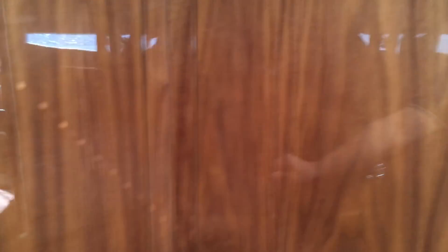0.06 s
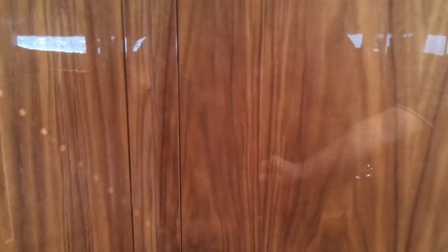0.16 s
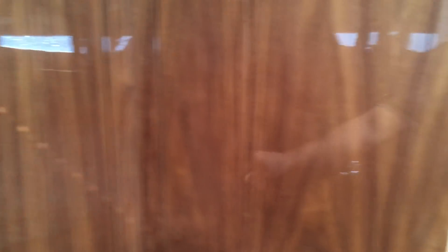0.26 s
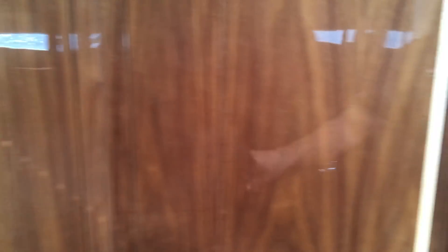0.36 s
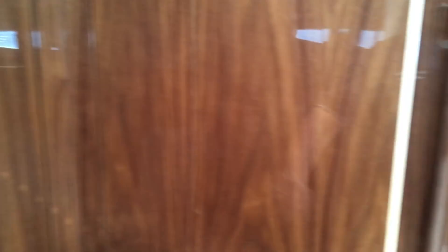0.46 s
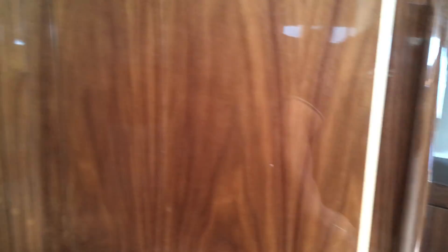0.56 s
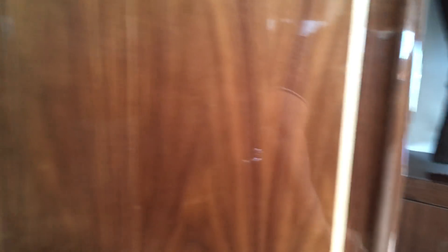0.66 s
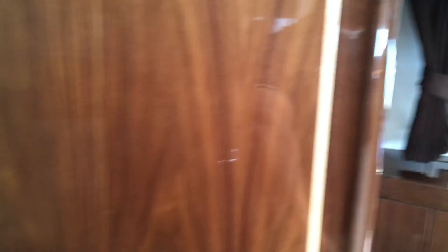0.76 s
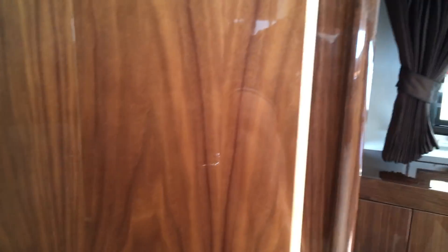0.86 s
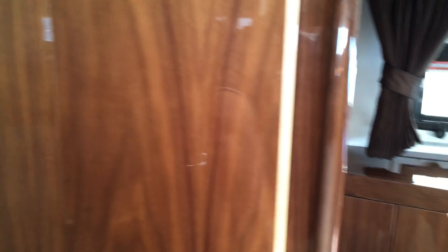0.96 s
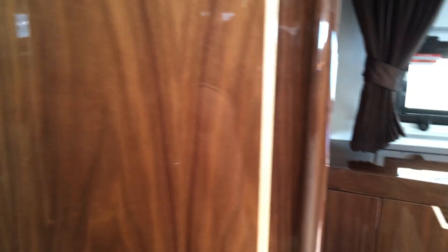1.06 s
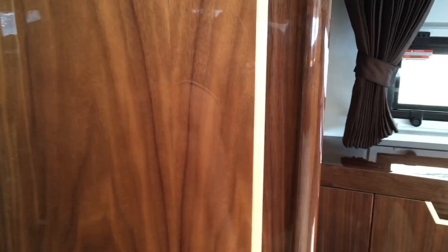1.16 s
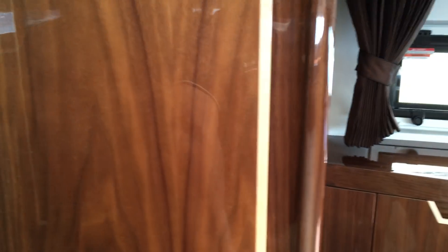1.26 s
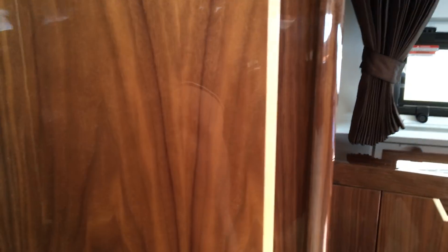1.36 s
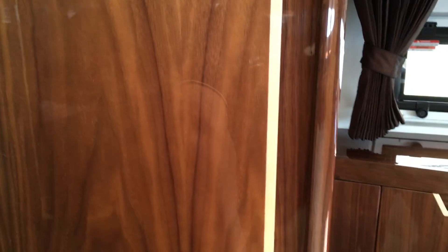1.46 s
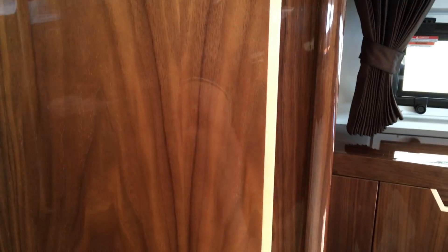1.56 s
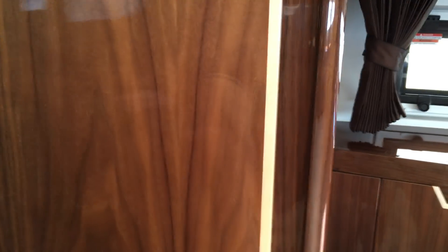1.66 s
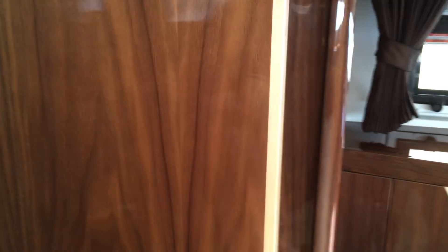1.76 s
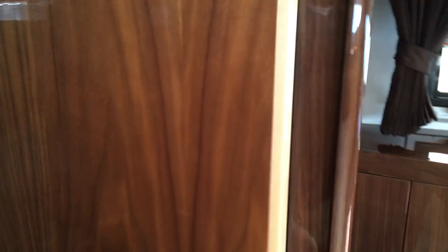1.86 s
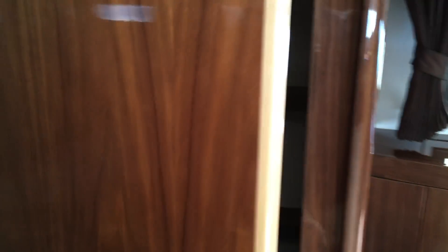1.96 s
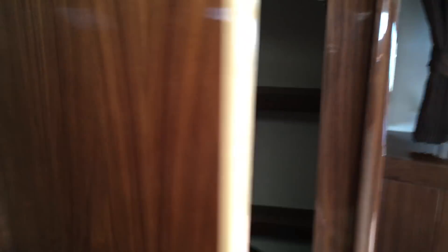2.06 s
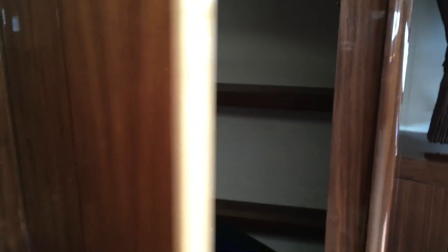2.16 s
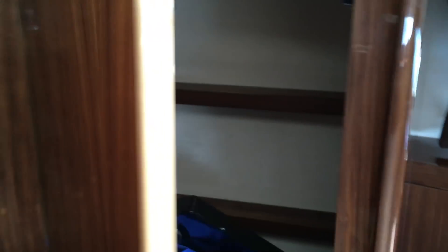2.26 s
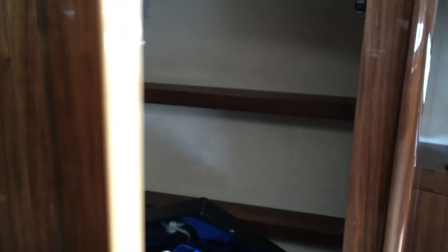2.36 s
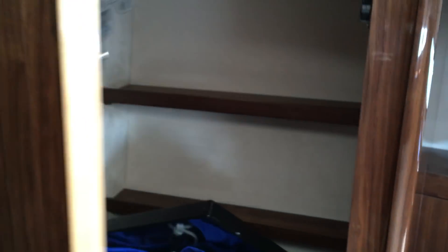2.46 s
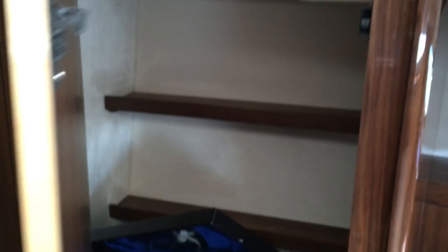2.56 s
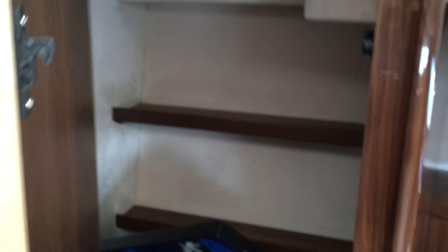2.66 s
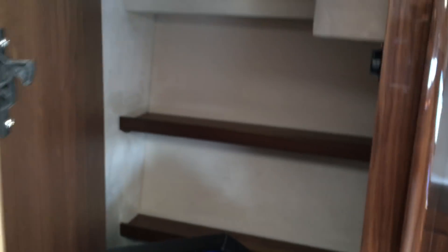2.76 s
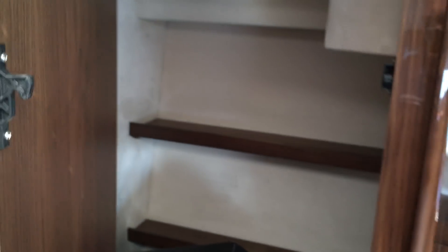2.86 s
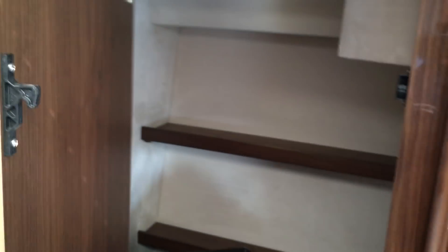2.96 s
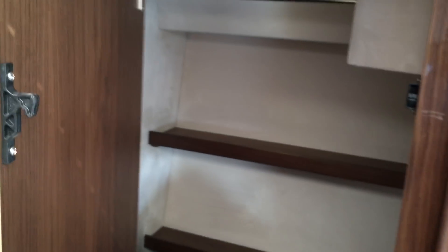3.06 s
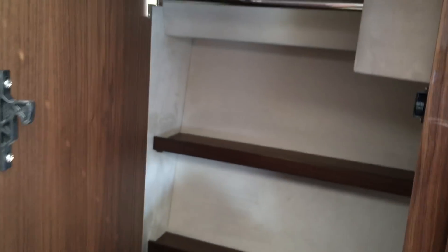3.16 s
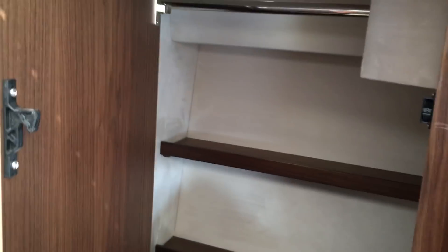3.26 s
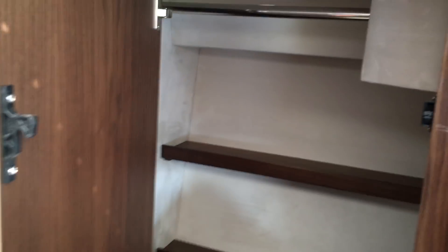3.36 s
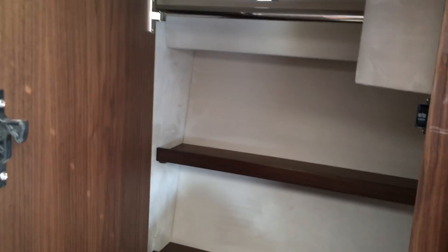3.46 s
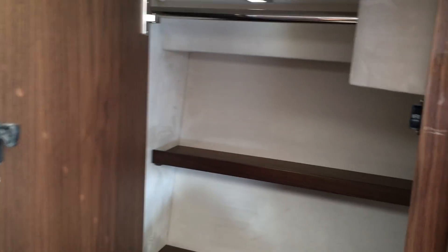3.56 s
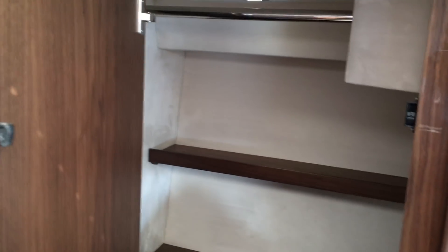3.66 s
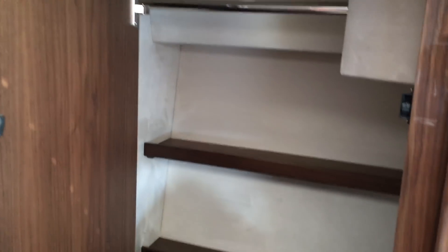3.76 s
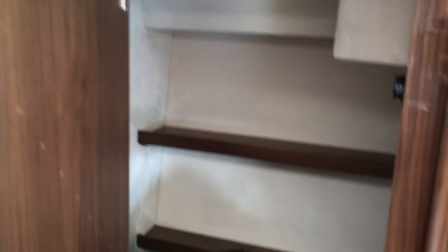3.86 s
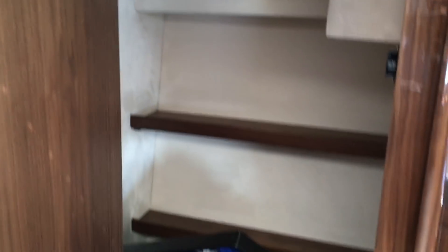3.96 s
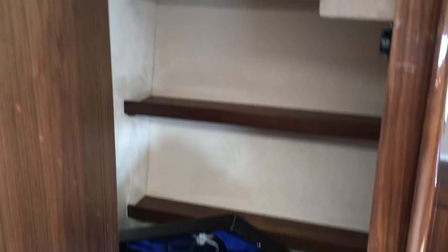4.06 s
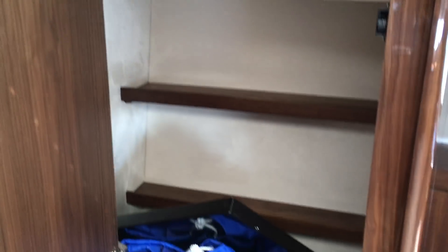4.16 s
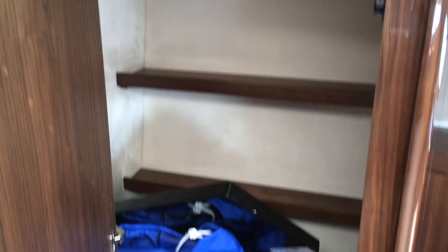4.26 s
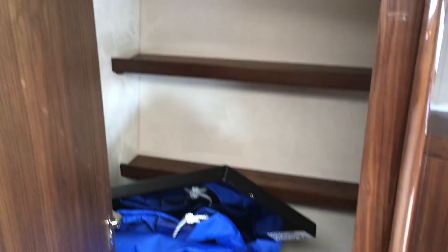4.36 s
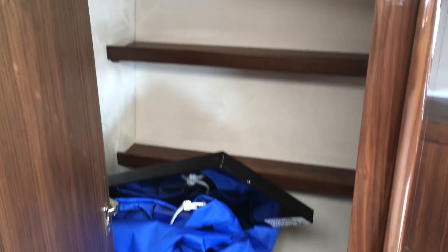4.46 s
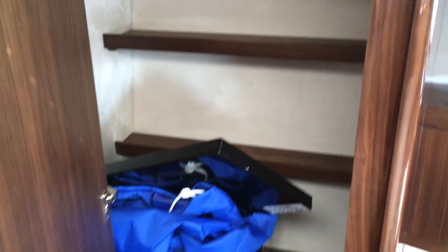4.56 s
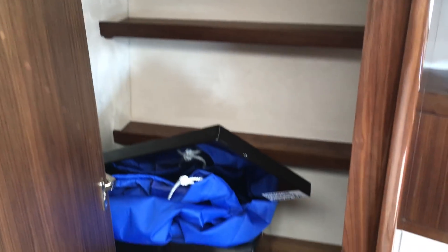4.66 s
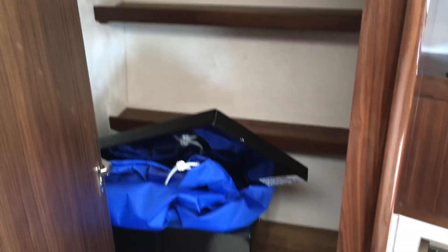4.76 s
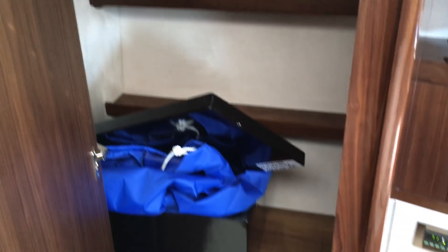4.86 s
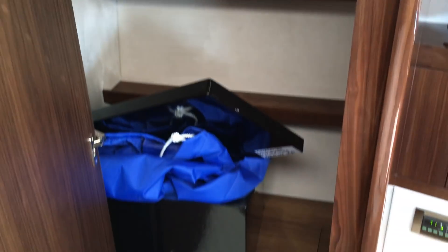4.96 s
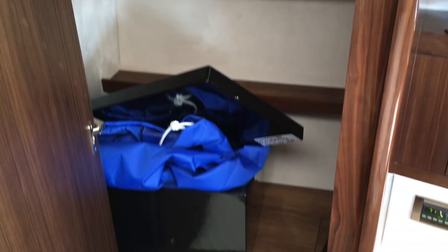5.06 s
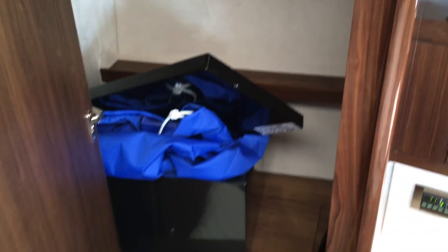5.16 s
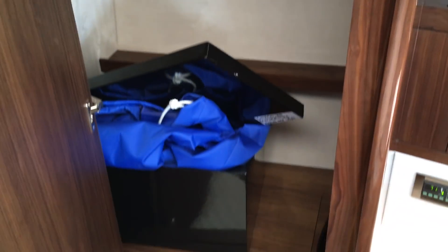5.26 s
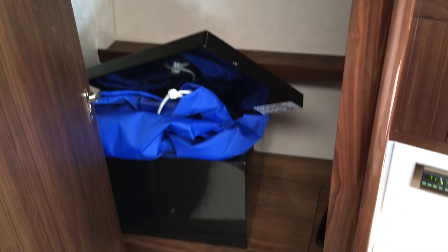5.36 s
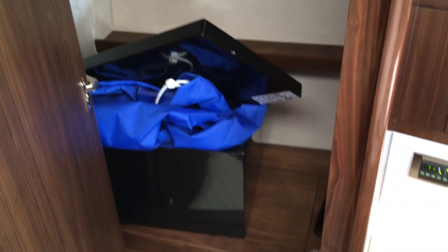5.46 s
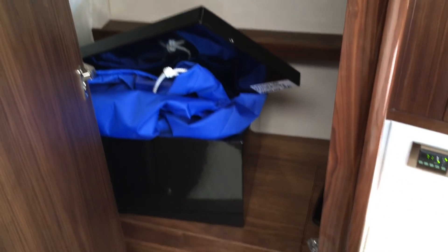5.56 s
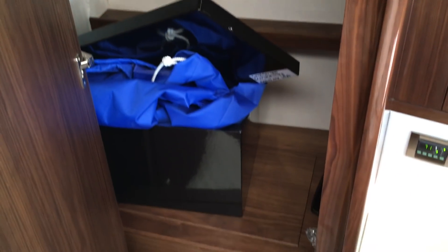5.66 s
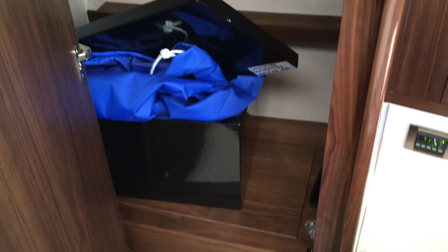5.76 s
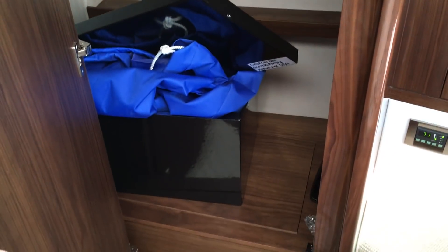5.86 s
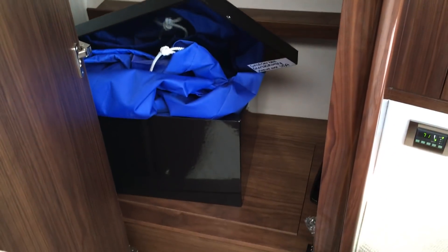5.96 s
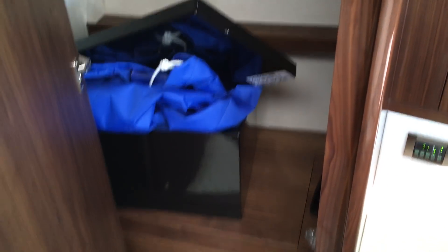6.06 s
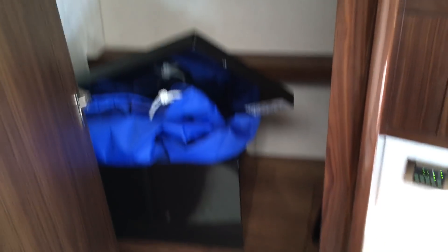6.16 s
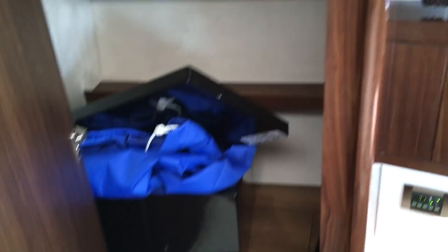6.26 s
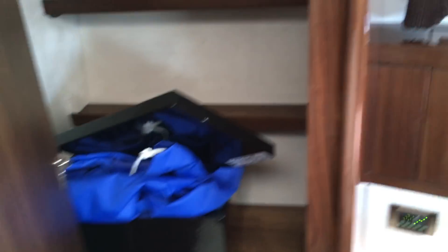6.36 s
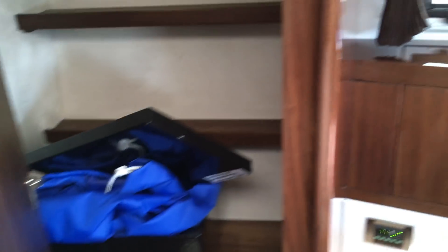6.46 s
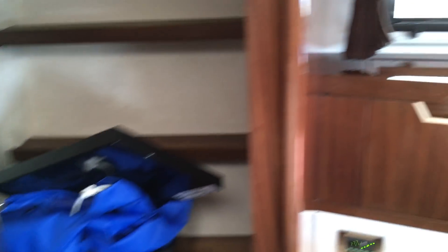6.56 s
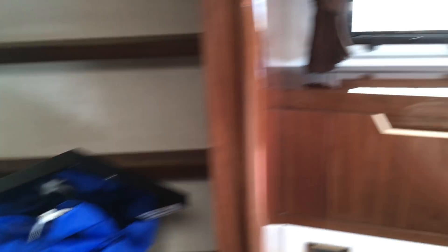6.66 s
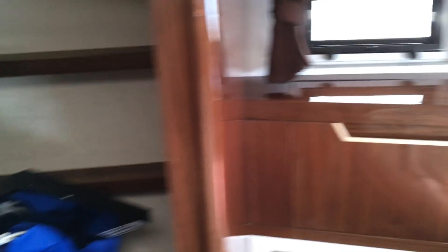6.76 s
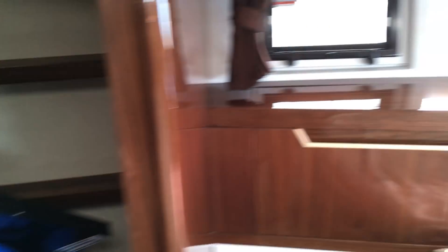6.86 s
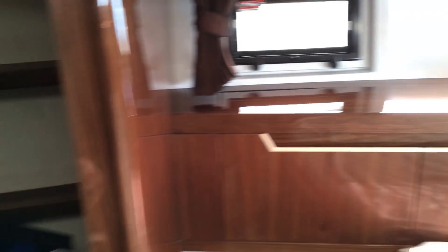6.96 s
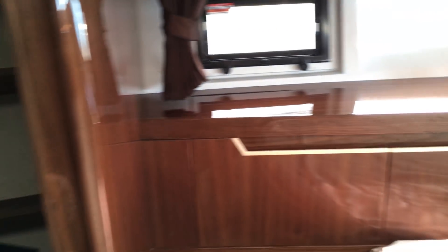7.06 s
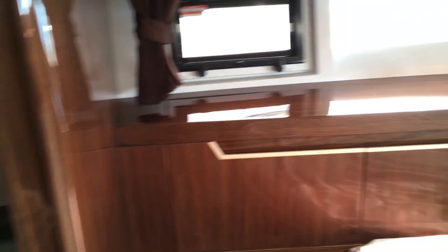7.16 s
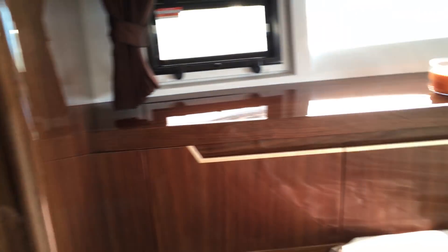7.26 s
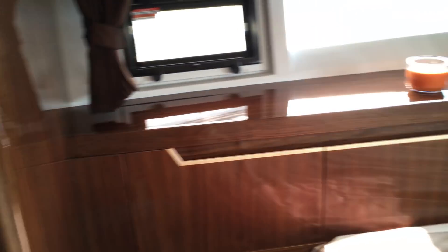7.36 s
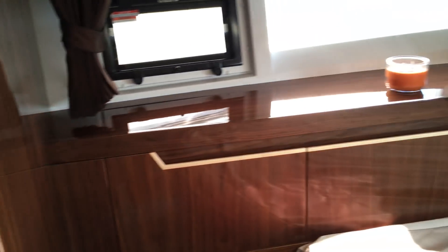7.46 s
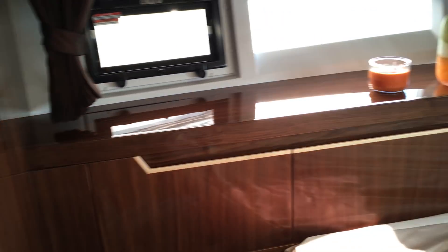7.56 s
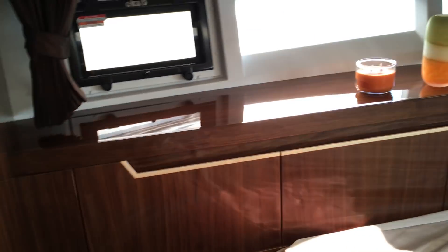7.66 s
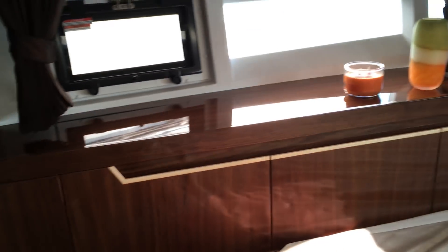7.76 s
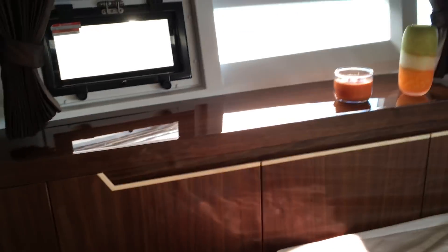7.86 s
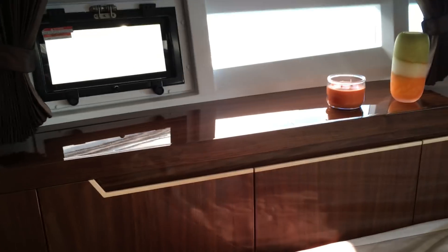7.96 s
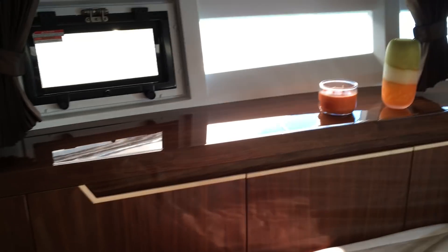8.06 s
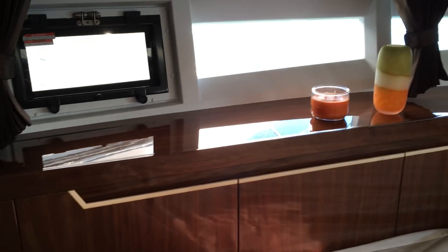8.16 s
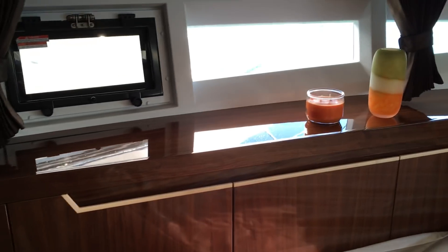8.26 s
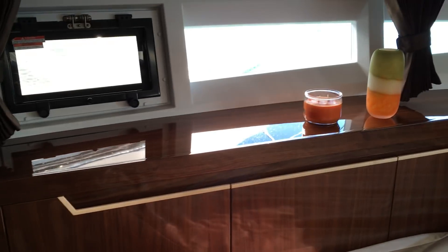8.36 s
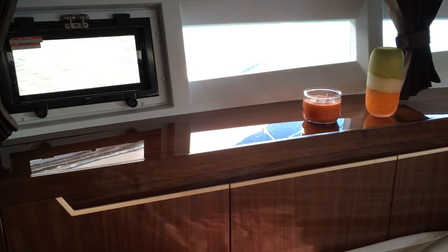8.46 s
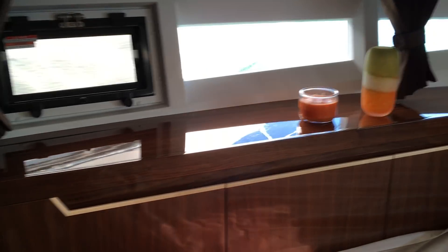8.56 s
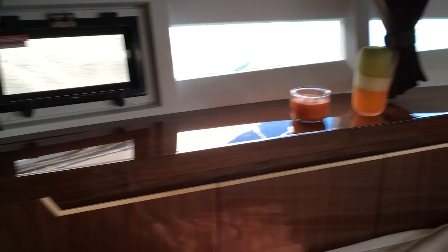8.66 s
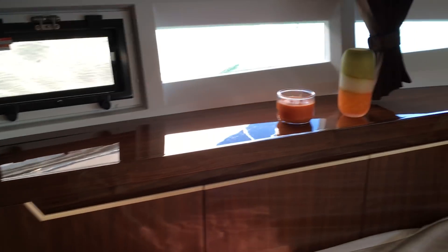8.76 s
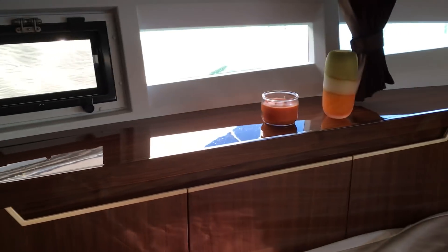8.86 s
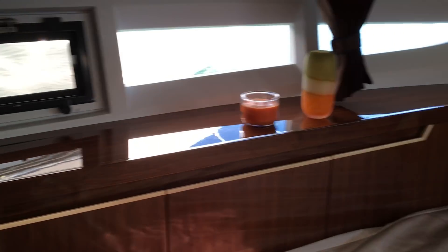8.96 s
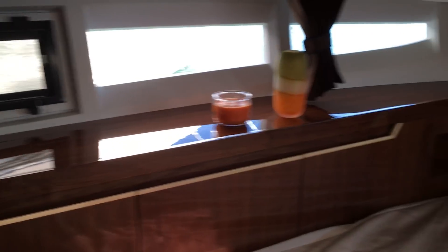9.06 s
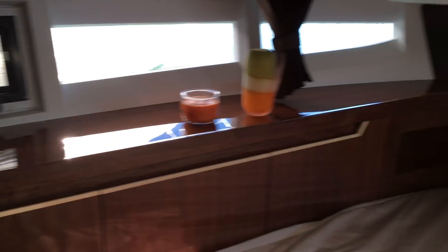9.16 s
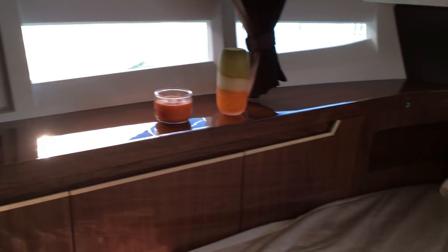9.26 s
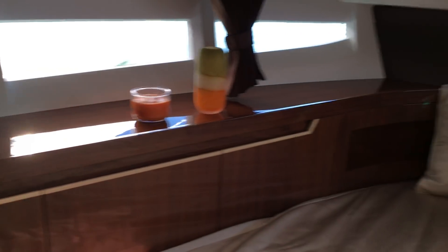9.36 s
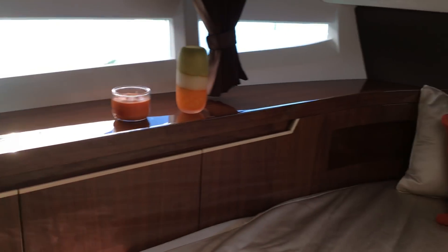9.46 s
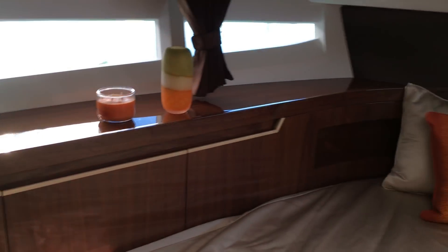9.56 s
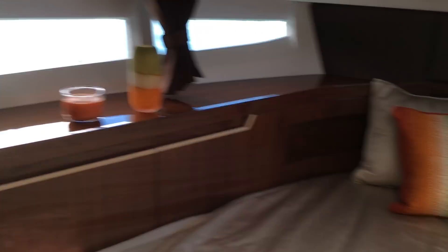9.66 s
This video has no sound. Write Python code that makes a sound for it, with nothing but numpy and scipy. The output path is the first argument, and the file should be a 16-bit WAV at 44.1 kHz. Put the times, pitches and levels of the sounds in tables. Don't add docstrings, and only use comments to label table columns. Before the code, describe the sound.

Close handheld microphone in a small wood-lined boat cabin. A low ventilation drone runs throughout. Finger taps lead straight into a loud door slam with latch snaps, a panel boom and buzzing fittings. A sleeve brushes, a cluster of sharp knocks follows, then mostly hum with a brief hinge creak and a small click. A heavier slam comes near the end, then faint brushing and a tap.

```python
import sys
import numpy as np
from scipy import signal
from scipy.fft import rfft, irfft, next_fast_len
from scipy.io import wavfile
from scipy.ndimage import uniform_filter1d

SR = 44100
rng = np.random.default_rng(int(sys.argv[2]) if len(sys.argv) > 2 else 0)


def volts_from_decibels(level):
    exponent = np.asarray(level, float) / 20
    return 10 ** exponent


def inscribe(sig):
    pcm = np.round(np.clip(np.atleast_2d(sig).T, -1, 1) * 32767)
    wavfile.write(sys.argv[1], SR, pcm.astype(np.int16))


N = 428192


def rms_one(x):
    return x / np.sqrt(np.mean(x ** 2) + 1e-20)


def in_time(rows):
    return np.interp(np.arange(N) / SR, *np.transpose(rows))


def at_hz(points, hz):
    table_hz, value = np.array(points).T
    return np.interp(np.log(hz), np.log(table_hz), value)


def shaped(spectrum):
    size = next_fast_len(N)
    hz = np.maximum(np.fft.rfftfreq(size, 1 / SR), 1)
    white = rfft(rng.standard_normal(size))
    return rms_one(irfft(white * volts_from_decibels(at_hz(spectrum, hz)), size)[:N])


def drift(rate_hz):
    hop, settle = 40, 4000
    r = np.exp(-2 * np.pi * rate_hz * hop / SR)
    white = rng.standard_normal(N // hop + settle + 2)
    slow = signal.lfilter([1], [1, -2 * r, r * r], white)[settle:]
    return np.interp(np.arange(N) / hop, np.arange(len(slow)), rms_one(slow))


def ring(x, hz, t60_s):
    r, w = volts_from_decibels(-60 / (t60_s * SR)), 2 * np.pi * hz / SR
    return signal.lfilter([0, np.sin(w)], [1, -2 * r * np.cos(w), r * r], x)


def narrow(hz, width_hz):
    t60_s = np.log(1000) / np.pi / width_hz
    once = ring(rng.standard_normal(N), hz, t60_s)
    return rms_one(ring(once, hz, t60_s))


def struck(modes, rise_s):
    out, t = np.zeros(N + SR), np.arange(SR // 2) / SR
    for hz, t60_s, pushes in modes:
        swing = (1 - np.exp(-t / rise_s)) * volts_from_decibels(-60 * t / t60_s) * np.sin(2 * np.pi * hz * t)
        for start_s, level_db in pushes:
            at = round(start_s * SR)
            out[at:at + len(t)] += volts_from_decibels(level_db) * swing
    return out[:N]


# freq_hz, density_db_per_hz
AIR = [(12, -69.5), (20, -44), (39, -10.5), (86, -6), (124, -3), (147, -7), (232, -13.5), (388, -24.5),
       (423, -33), (562, -33.5), (1610, -43.5), (1760, -43.5), (5990, -50.5), (15800, -63), (18200, -69)]
# time_s, level_db
NEARNESS = [(0, -36), (.75, -35.5), (1.9, -36), (2.6, -37), (3.35, -35), (5.2, -37), (6.3, -38.5),
            (7.4, -40), (9.71, -44.5)]
# (from_s, to_s)
TONES = [(1031, 20, -65, [(.4, 1.5), (3.7, 4.6), (5.3, 5.1), (7.3, 7.8)]), (782, 25, -67, [(1.2, 2.77),
         (3.5, 4.9)]), (638, 28, -63, [(0, 1.0), (2.5, 3.2)]), (1598, 54, -66.5, [(0, 0.63), (5.0, 6.6),
         (9.5, 9.4)]), (2491, 240, -65.5, [(0, 1.23), (5.0, 6.5), (8.5, 8.4)]),
         (5300, 100, -73.5, [(3.1, 6)]), (2013, 40, -68.5, [(0, 0.18), (2.7, 3.6), (5.2, 6.8), (7.5, 7.4)]),
         (1230, 40, -66.5, [(.9, 1.4), (2.4, 2.9)]), (3160, 83, -75.5, [(3.1, 4.5), (8.1, 10)]),
         (4036, 90, -75, [(2.3, 4.8)]), (915, 88, -63, [(6.8, 6.4), (9.0, 9.5)])]
# freq_hz, width_hz, level_db
DUCTS = [(79, 25, -41), (214.7, 51, -49.5), (328.7, 140, -57), (427, 34, -63), (1320, 30, -73),
         (2200, 65, -76), (3720, 56, -79.5), (4350, 80, -78.5), (5922, 120, -80.5), (6400, 150, -81.5)]
AIR_DB, AIR_FOLLOWS = -35.5, .04
TURN_DB_PER_S, TURNED_AWAY_DB = 40.5, -8


def ventilation():
    t, near_db = np.arange(N) / SR, in_time(NEARNESS)
    air_db = AIR_DB + AIR_FOLLOWS * (near_db - near_db.mean()) + .8 * drift(1.7)
    out = volts_from_decibels(air_db) * shaped(AIR)
    out += volts_from_decibels(near_db + 0.5) * narrow(119.9, width_hz=13)
    for hz, width_hz, level_db, spells in TONES:
        away_s = np.min([np.maximum(np.maximum(start_s - t, t - end_s), 0) for start_s, end_s in spells], axis=0)
        facing_db = np.maximum(-TURN_DB_PER_S * away_s, TURNED_AWAY_DB)
        out += volts_from_decibels(level_db + 1.5 * drift(0.48) + facing_db) * narrow(hz, width_hz)
    for hz, width_hz, level_db in DUCTS:
        out += volts_from_decibels(level_db + 2 * drift(1.0)) * narrow(hz, width_hz)
    return out


# start_s, peak_db, knock_db (wood), snap_db (bright)
TAPS = [(0.0, -31.5, 6.5, 5), (0.0074, -28, -3, 0), (.016, -37, -8, 12), (0.378, -35, -5.5, -7),
        (1.428, -34, -8.5, -18), (1.609, -39, -11, -7), (1.998, -38.5, 1, -36), (2.1598, -51, 16.5, -14.5),
        (2.233, -44, 0, -21), (2.282, -54, 5, -18), (2.4461, -39, 7, -36), (8.0479, -34.5, -15, 5.5),
        (8.3589, -45, 2, -10.5), (8.5044, -53.5, 2, 2), (8.913, -41.5, -16.5, -10), (9.706, -39, -1, -0.5)]
# start_s, peak_db
TICKS = [
    (.139, -49),
    (1.459, -30),
    (2.111, -41),
    (8.389, -36.5),
    (8.662, -48),
    (8.676, -41.5),
]
# start_s, peak_db, knock_db (wood), snap_db (bright), ring_length_factor
CONTACTS = [(0.1608, -4.5, -18, 5, 1.92), (0.1886, -3.5, -0.5, 2.5, 1.05), (0.2063, -4, 3, -10, 1.29),
            (1.4616, -12.5, -14, -35, 1.06), (1.5542, -21.5, -5, -2, 0.92), (1.5689, -17, -9.5, -4, 1.3),
            (1.6354, -7, -31, -3, 1.23), (1.645, -24, 2, -4, .9), (1.6575, -8.5, -10, -11, 0.48),
            (1.6628, -6.5, -12, -5.5, 1.2), (1.7004, -41.5, 4, 12, 1.8), (1.7328, -9.5, -7.5, 3, 1.55),
            (2.0943, -28.5, -14.5, -2.5, 1.8), (4.9166, -36, -5, 3.5, 1.62), (8.3949, -22, -6, -7.5, 1.6),
            (8.6856, 1, -15, -1, 0.82), (8.7001, -5, -8, 0.5, 1.9), (8.7156, 5.5, -11.5, -57, 1.1),
            (8.7406, -10, 1, -10, 1.14)]
# freq_hz, t60_s
RING = [(300, .13), (1000, 0.091), (3000, 0.06), (8000, 0.029), (16000, 0.025)]
TAP_LENGTH, TICK_LENGTH = 1.1, .45
TICK_KNOCK_DB, TICK_SNAP_DB = -9, 2.5
LUMPY_DB = 1.2


def contacts(crack_db=6.0, crack_t60_s=0.0043, bend=1.3, cabin_db=-27, cabin_t60_s=.14):
    rows = list(CONTACTS)
    rows += [(*row, TAP_LENGTH) for row in TAPS]
    rows += [(*row, TICK_KNOCK_DB, TICK_SNAP_DB, TICK_LENGTH) for row in TICKS]
    out, size = np.zeros(N + SR), SR // 5
    t = np.arange(size) / SR
    edges_hz = 250 * 2 ** np.arange(0, 6.3, 1 / 3)
    bank = [signal.butter(2, pair, "band", fs=SR, output="sos") for pair in zip(edges_hz, edges_hz[1:])]
    centres_hz = np.sqrt(edges_hz[:-1] * edges_hz[1:])
    crack = volts_from_decibels(crack_db - 60 * t / crack_t60_s) + volts_from_decibels(cabin_db - 60 * t / cabin_t60_s)
    for start_s, peak_db, knock_db, snap_db, length in rows:
        *white, luck = rng.standard_normal((3, size))
        colour = [(300, knock_db + 9.5), (750, knock_db + 6.5), (2700, 0.0064),
                  (10000, snap_db - 6.0), (17000, snap_db - 14.5)]
        hit = 0
        for k, hz in enumerate(centres_hz):
            fade = crack + volts_from_decibels(-60 * (t / (at_hz(RING, hz) * length)) ** bend)
            band_db = at_hz(colour, hz) - 3.0 + LUMPY_DB * luck[k]
            hit = hit + volts_from_decibels(band_db) * signal.sosfilt(bank[k], white[k % 2] * fade)
        at = round(start_s * SR)
        out[at:at + size] += volts_from_decibels(peak_db) * hit
    return out[:N]


# (start_s, level_db)
PANEL = [(52, 0.57, [(.36, -25), (1.47, -23.5), (1.67, -18), (8.722, -15)]), (64.7, 1, [(.97, -25),
         (8.9, -24)]), (66.3, 0.26, [(8.793, -2.5)]), (72.5, 0.27, [(.209, -8), (1.472, -19),
         (8.361, -19.5), (8.704, -3.5)]), (94.4, 0.22, [(.29, -10.5)]), (107, .2, [(1.6, -25.5),
         (1.667, -18), (2.049, -26), (2.17, -16), (8.4, -18.5), (8.735, 2.5)]), (117, .19, [(.045, -18.5),
         (1.691, -15), (8.754, 5.5)]), (127, .085, [(.179, -6), (.191, 1), (.237, 4.5), (.31, -12.5),
         (1.735, -18.5), (8.719, 6)]), (201, .085, [(.004, -17), (.215, 1), (8.775, -9.5)]),
         (285, 0.076, [(.2, -24), (8.77, -38.5)])]


def panel():
    return struck(PANEL, rise_s=0.00063)


# (start_s, level_db)
LATCH = [(2160, 0.035, [(1.554, -23), (1.57, -20), (1.733, -18)]), (2550, .052, [(.161, -21), (.207, -11.5),
         (2.11, -40.5), (8.396, -28)]), (2800, 0.084, [(1.462, -41), (1.735, -17.5), (2.096, -39)]),
         (3070, .048, [(8.699, -13)]), (3440, .038, [(1.663, -13.5), (1.68, -20), (8.049, -45)]),
         (3840, .039, [(.189, -10.5)]), (4050, 0.037, [(2.096, -35)]), (4570, .015, [(.161, 0.82)]),
         (5180, 0.03, [(1.636, -28), (4.916, -39)]), (6800, .05, [(2.097, -42)]),
         (8200, .012, [(1.635, -13), (1.733, -10), (8.049, -41.5), (8.396, -22)]),
         (13100, 0.0085, [(1.461, -28), (1.635, -11), (1.733, -22.5), (4.916, -42), (8.396, -25)]),
         (9000, 0.052, [(1.57, -32), (1.733, -22)])]


def latch():
    return struck(LATCH, rise_s=0.00033)


# start_s, bright_db, woody_db, length_factor
RATTLE = [
    (0.194, -18, -15, 1.05),
    (8.69, -17.5, -10, 1.2),
]
# freq_hz, density_db_per_hz
FITTINGS = [(2500, -16.5), (4500, -2), (8000, 6), (12000, -5.5), (17000, -11)]
# freq_hz, density_db_per_hz
CARCASS = [(200, -5.5), (350, -4), (700, -10.5), (1500, 0.5), (2500, -7), (5000, -22)]
BRIGHT_FADE_S, BRIGHT_BEND = 0.085, 1.3
WOODY_LAG_S, WOODY_FADE_S = .019, 0.092


def rattle(grainy_db=2.5):
    bright, woody = 0, 0
    for start_s, bright_db, woody_db, length in RATTLE:
        age_s = (np.arange(N) / SR - start_s) / length
        bright_fade_db = -60 * (np.abs(age_s) / BRIGHT_FADE_S) ** BRIGHT_BEND
        woody_fade_db = -60 * np.abs(age_s - WOODY_LAG_S) / WOODY_FADE_S
        bright = bright + (age_s > 0) * volts_from_decibels(bright_db + bright_fade_db)
        woody = woody + (age_s > 0) * volts_from_decibels(woody_db + woody_fade_db)
    out = 0
    for shake, body in ((bright, FITTINGS), (woody, CARCASS)):
        grain = volts_from_decibels(grainy_db * drift(90) - 5.5)
        out = out + uniform_filter1d(shake, size=150) * grain * shaped([(20, -80.0)] + list(body))
    return out


# (start_s, level_db)
FRAME = [(453.5, .09, [(.222, -28), (1.733, -15)]), (623, .076, [(.207, -29), (1.733, -10)]),
         (710, .11, [(8.716, -16.5)]), (860, 0.098, [(8.41, -29.5)]), (1191, 0.055, [(.212, -29.5),
         (1.462, -28.5), (1.657, -28)]), (1442.5, 0.076, [(1.635, -20), (2.448, -56.5), (8.396, -29.5),
         (8.715, -8)]), (1620, 0.023, [(1.733, -8), (2.102, -41), (8.396, -25.5), (8.72, -6.5)]),
         (1770, 0.03, [(1.733, -12.5)]), (1890, .085, [(.207, -21.5), (8.722, -9.5)])]


def frame():
    return struck(FRAME, rise_s=0.00033)


# start_s, level_db, hold_s, sheen_db
BRUSHES = [
    (0.37, -59, .08, -5.5),
    (0.497, -52, 0.02, -5.5),
    (9.079, -75, .06, 12.5),
    (9.151, -59, 0.011, -2),
    (9.624, -63.5, .055, 9),
]
# freq_hz, density_db_per_hz
CLOTH = [(400, -2), (2000, -4.5), (5000, -8), (10000, -12.5), (16000, -18.5)]
STROKE_RISE_DB_PER_S, STROKE_FALL_DB_PER_S = 221, 130
SHEEN_HZ = 9000


def brushes():
    t, dull, sheen = np.arange(N) / SR, 0, 0
    for start_s, level_db, hold_s, sheen_db in BRUSHES:
        rise_db = STROKE_RISE_DB_PER_S * np.maximum(start_s - t, 0)
        fall_db = STROKE_FALL_DB_PER_S * np.maximum(t - start_s - hold_s, 0)
        stroke = volts_from_decibels(level_db - rise_db - fall_db)
        dull = dull + stroke
        sheen = sheen + volts_from_decibels(sheen_db) * stroke
    noise = volts_from_decibels(4.5 + 0.85 * drift(25)) * shaped(CLOTH)
    top = signal.butter(2, SHEEN_HZ, "high", fs=SR, output="sos")
    return dull * noise + sheen * signal.sosfilt(top, noise)


# time_s, slips_per_s, level_db
CREAK = [
    (3.1, 55, -55),
    (3.21, 60, -46),
    (3.26, 65, -49),
    (3.35, 80, -42.5),
    (3.41, 80, -48),
    (3.44, 80, -62),
]
# freq_hz, level_db, t60_s
HINGE = [(1050, -5, .012), (1480, 1.5, .018), (1950, -8, .012), (2500, -12, .012), (3200, -18, .01)]
# time_s, pitch_hz, level_db
SQUEAKS = [
    [(3.26, 11300, -100), (3.33, 11600, -68), (3.4, 12060, -77.5), (3.44, 11800, -92)],
    [(6.8, 10600, -95), (6.88, 11340, -74), (6.98, 11630, -69.5), (7.1, 11400, -80), (7.16, 11230, -96.5)],
]
SLIP_JITTER, UNEVEN_DB = .2, 2.5


def hinge():
    t, creak = np.arange(N) / SR, np.array(CREAK)
    slips_per_s = in_time(creak[:, :2]) * (1 + SLIP_JITTER * drift(30))
    turns = np.cumsum(slips_per_s) / SR
    slip_db = in_time(creak[:, ::2]) + UNEVEN_DB * rng.standard_normal(N)
    slips = np.diff(np.floor(turns), prepend=0) * volts_from_decibels(slip_db)
    slips *= (t > creak[0, 0]) * (t < creak[-1, 0])
    out = sum(volts_from_decibels(level_db) * ring(slips + 1e-18, hz, t60_s) for hz, level_db, t60_s in HINGE)
    for squeak in SQUEAKS:
        rows = np.array(squeak)
        pitch_hz = in_time(rows[:, :2]) + 150.0 * drift(120)
        whistle = np.sin(2 * np.pi * np.cumsum(pitch_hz) / SR)
        level_db = in_time(rows[:, ::2]) + 3.0 * drift(40)
        out += volts_from_decibels(level_db) * whistle * (t > rows[0, 0]) * (t < rows[-1, 0])
    return out


def scene():
    door = contacts() + panel() + latch() + rattle() + frame() + hinge()
    return (ventilation() + door + brushes())[None]


def roll_off(x):
    return signal.sosfilt(signal.butter(12, 17330, fs=SR, output="sos"), x)


# freq_hz, width_hz, dip_db
PORT_DIPS = [(4890, 710, -5.5), (10450, 820, -7.5)]
# freq_hz, density_db_per_hz
HISS = [(300, -25), (3000, -9), (10000, -0.5), (16500, -1), (18500, -18)]
HISS_DB, CUTOFF_HZ = -72, 18900


def record(dry):
    x = signal.sosfilt(signal.butter(2, 30, "high", fs=SR, output="sos"), dry[0])
    for hz, width_hz, dip_db in PORT_DIPS:
        x = x - (1 - volts_from_decibels(dip_db)) * signal.lfilter(*signal.iirpeak(hz, hz / width_hz, fs=SR), x)
    level_db = 20 * np.log10(uniform_filter1d(np.abs(x), size=400) + 1e-9)
    over_db = np.maximum(level_db + 21.0, 0) * 0.36
    ramp_db = 22.0 * np.arange(N) / SR
    held_db = np.maximum.accumulate(over_db + ramp_db) - ramp_db
    smooth = np.exp(-1 / (0.057 * SR))
    x = x * volts_from_decibels(-signal.lfilter([1 - smooth], [1, -smooth], held_db))
    x = x + volts_from_decibels(HISS_DB) * shaped(HISS)
    x = x / (1 + np.abs(x) ** 6.0) ** (1 / 6.0)
    x = signal.sosfilt(signal.cheby2(12, 70, CUTOFF_HZ, fs=SR, output="sos"), x)
    return roll_off(x[None])


dry = scene()
out = record(dry)
inscribe(out)
```